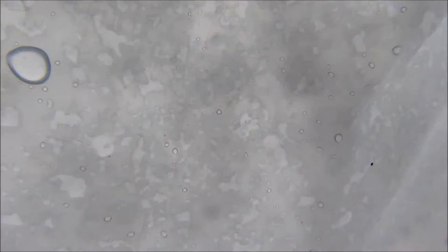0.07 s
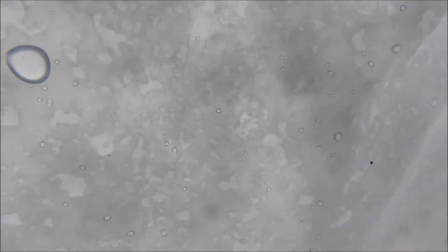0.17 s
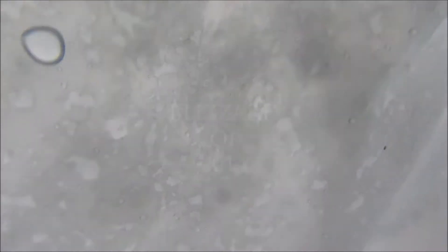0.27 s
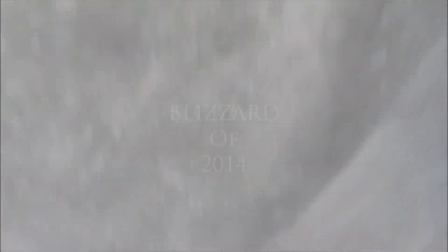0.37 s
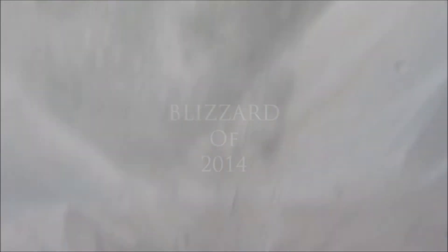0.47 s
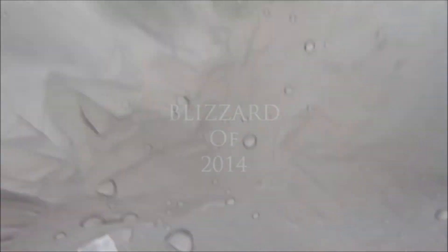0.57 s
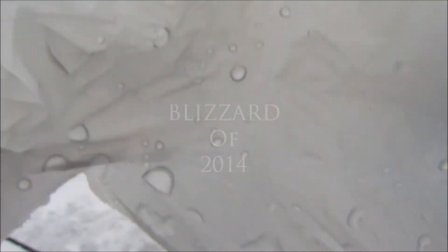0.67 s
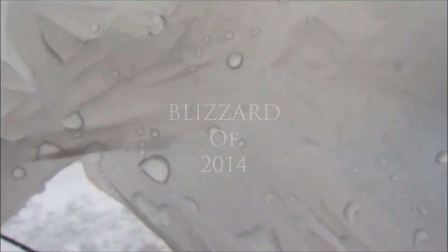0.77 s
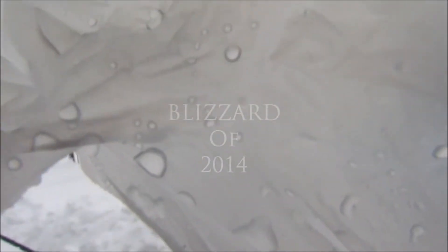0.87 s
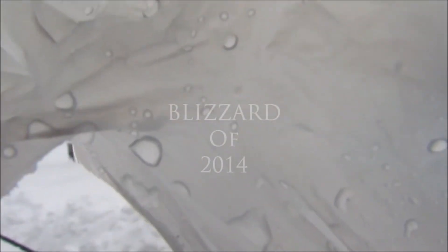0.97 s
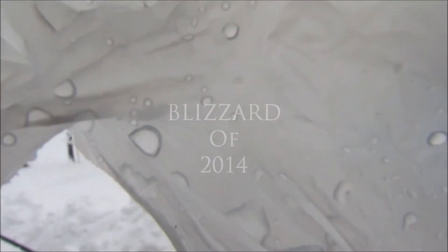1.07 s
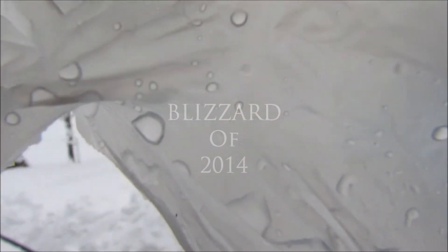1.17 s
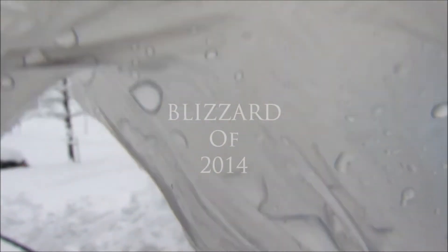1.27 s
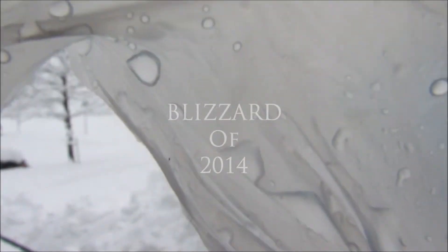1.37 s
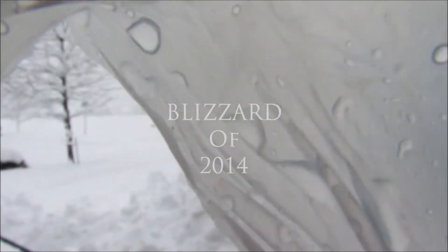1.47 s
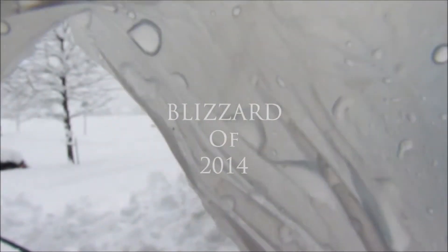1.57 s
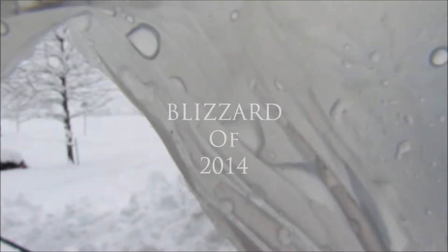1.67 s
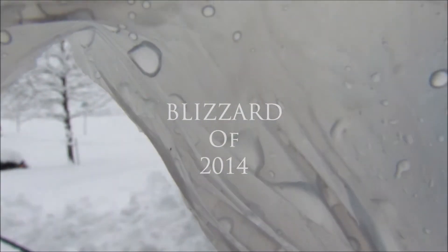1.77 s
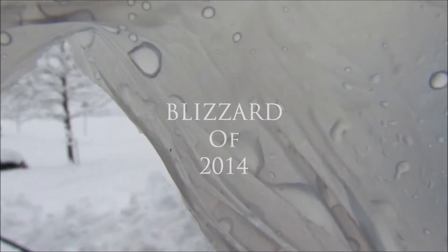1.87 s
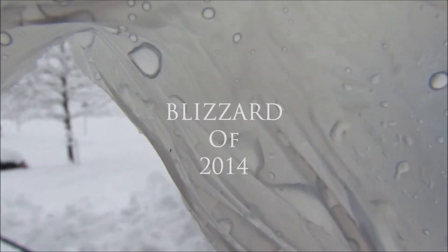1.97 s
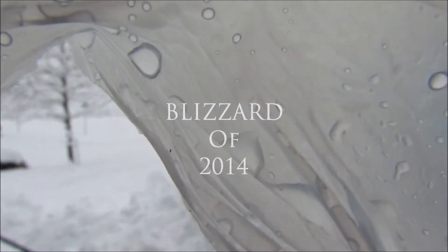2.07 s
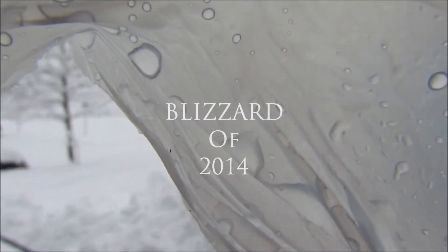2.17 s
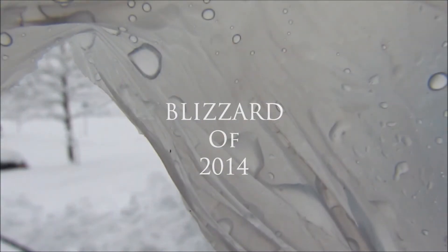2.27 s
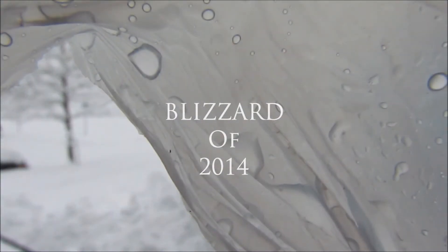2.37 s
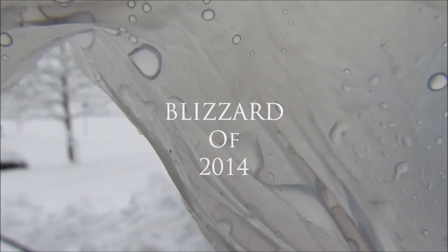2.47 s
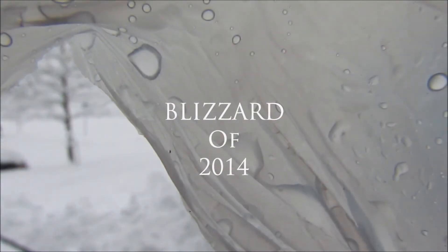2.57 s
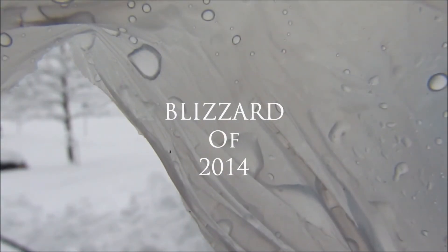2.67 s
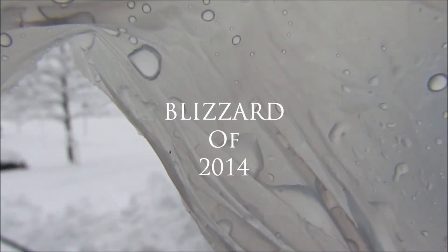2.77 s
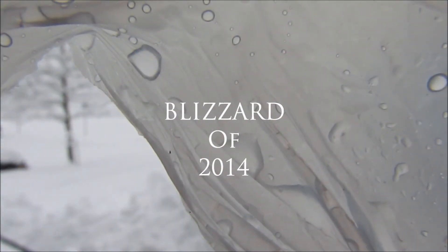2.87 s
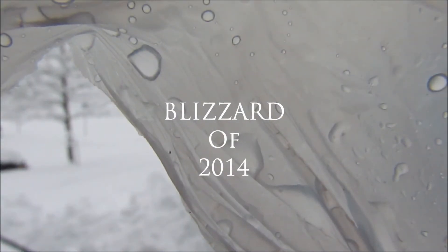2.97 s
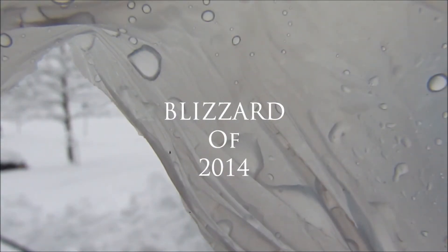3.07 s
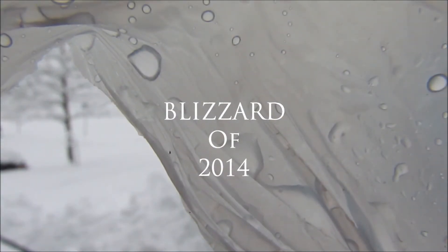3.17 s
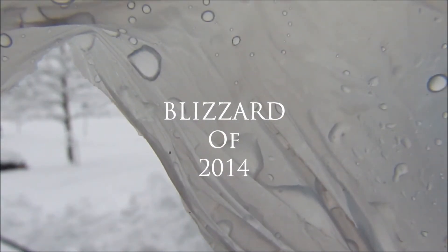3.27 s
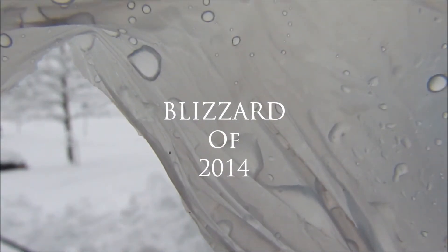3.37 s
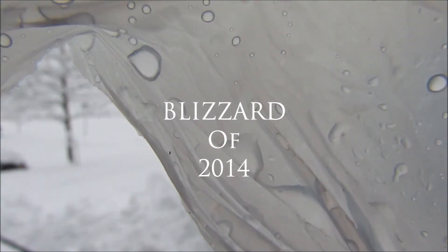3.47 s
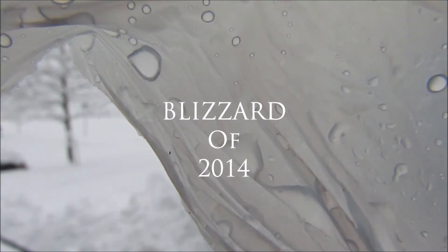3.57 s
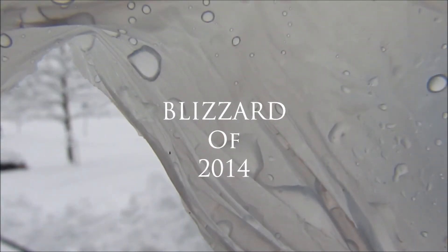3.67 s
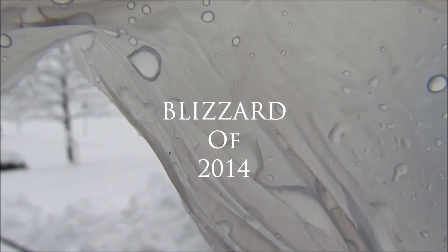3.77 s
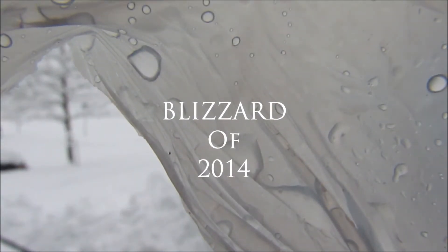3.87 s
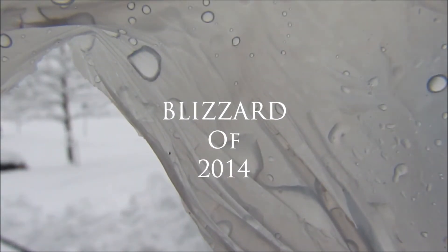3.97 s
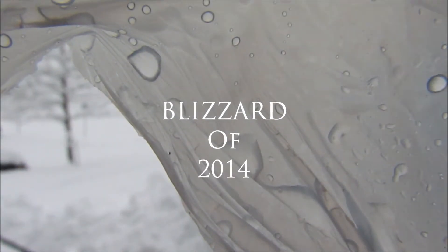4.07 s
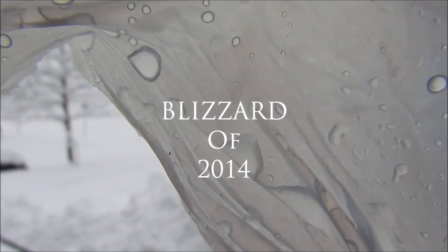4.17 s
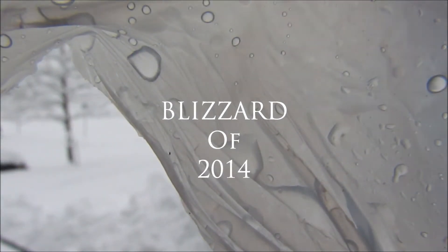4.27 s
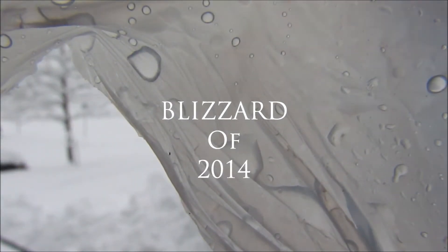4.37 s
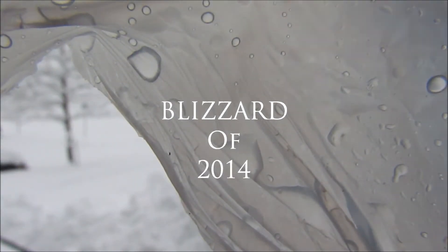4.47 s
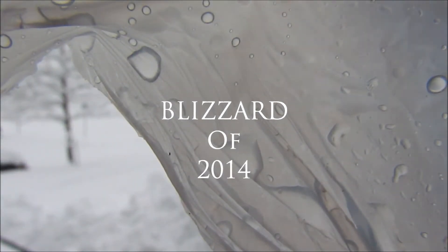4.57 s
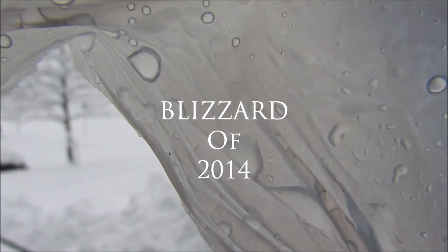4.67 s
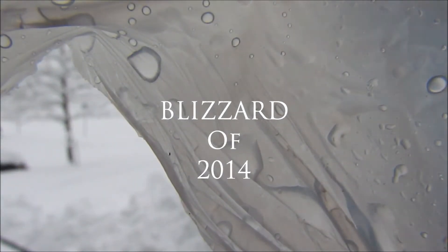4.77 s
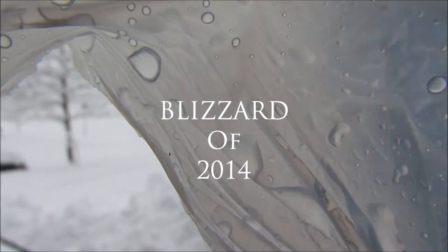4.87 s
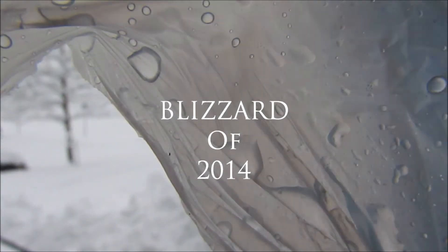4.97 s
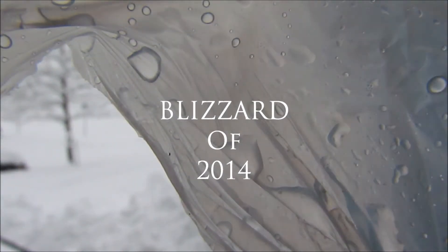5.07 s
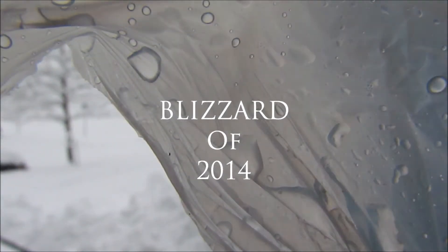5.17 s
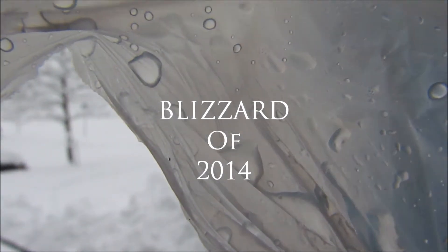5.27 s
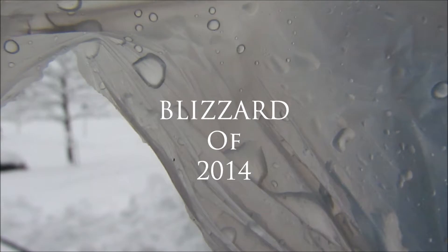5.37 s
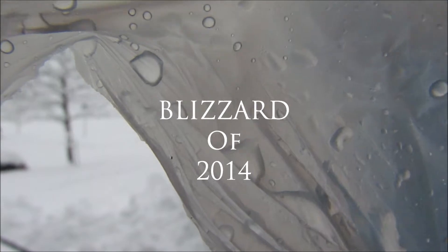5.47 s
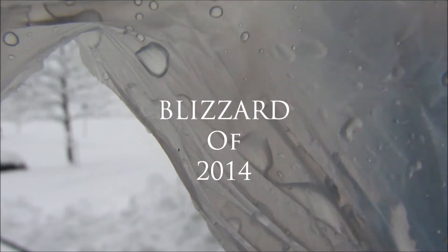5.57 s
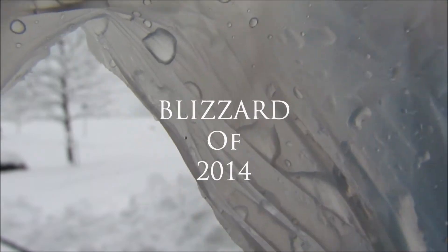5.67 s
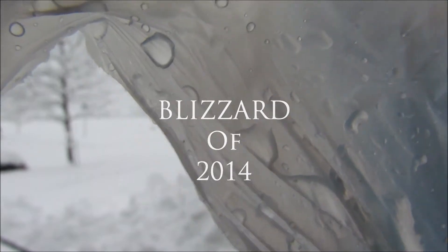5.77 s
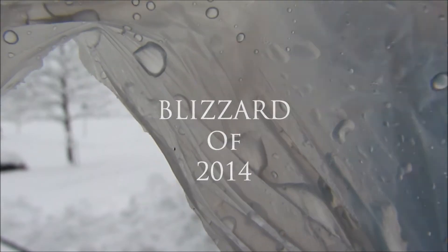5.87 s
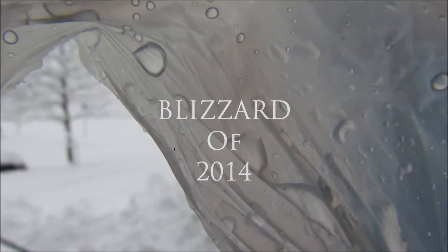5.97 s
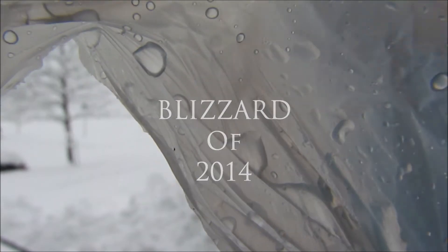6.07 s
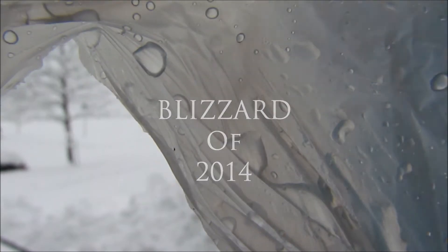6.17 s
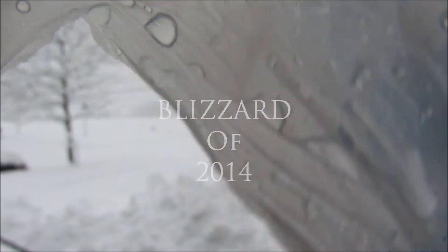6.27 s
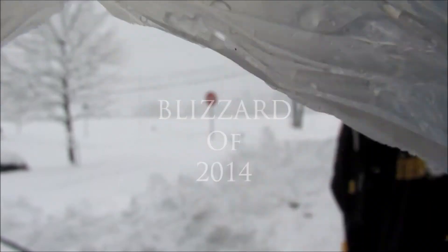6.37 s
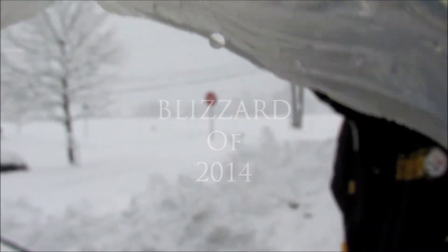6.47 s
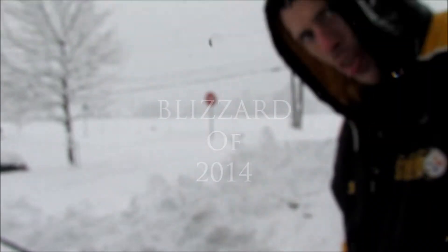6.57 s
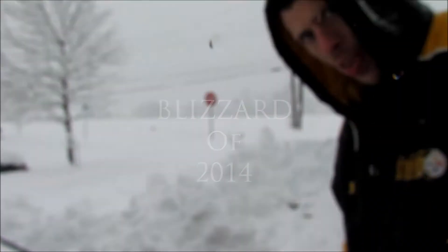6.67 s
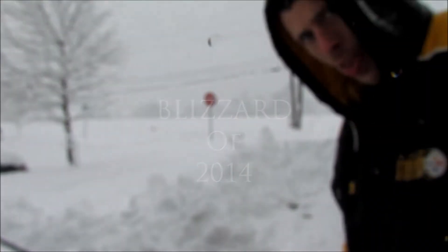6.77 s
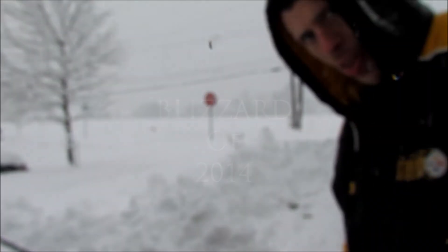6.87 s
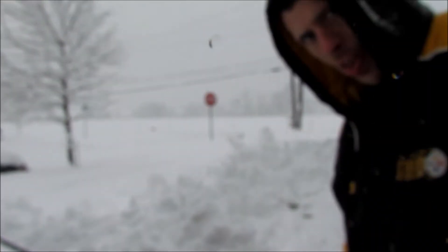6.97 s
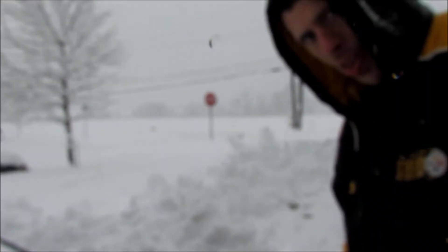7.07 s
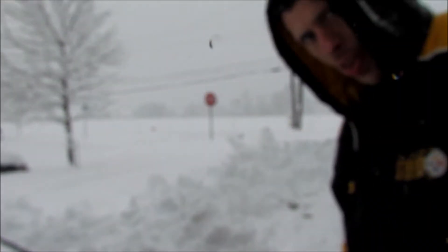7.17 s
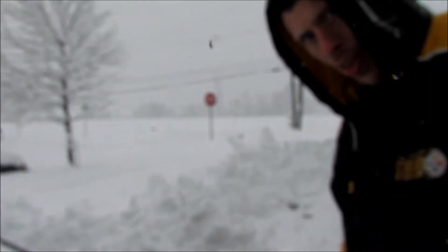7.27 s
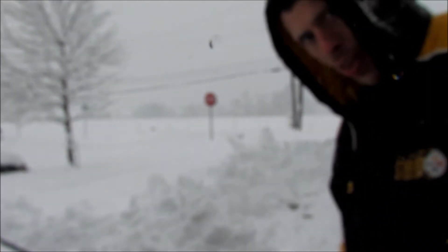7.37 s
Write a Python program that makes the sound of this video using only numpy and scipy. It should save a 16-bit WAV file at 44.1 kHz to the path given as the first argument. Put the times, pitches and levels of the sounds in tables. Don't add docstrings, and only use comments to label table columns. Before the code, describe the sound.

After a tiny silent gap, sound opens at about 0.16 s with a thin plastic sheet being pulled right across a stereo microphone outdoors. Snaps cluster at 0.2-0.4 s, then dense bright crackling and rustling swell around 0.5-0.8 s. More crisp snaps follow near 0.85-1.15 s, a hard cluster at 1.4 s, and very sharp cracks at 1.86 and 2.03 s. From 2.1 to 5.3 s the sheet is merely held: faint hiss and muffled still air, with scattered small ticks, dull hollow pops near 3.04 and 3.3 s, a snap at 3.75 s, a small flurry at 4.3-4.65 s and a pop at 5.0 s. At 5.37 s a strong crackle and thump begin the lifting; crinkling comes in uneven bursts, loud at 6.3 s, then fuller rustling from 6.45 s, with a hard snap at 7.03 s and last clicks and pops until about 7.4 s.

```python
import sys
import numpy as np
from scipy import signal
from scipy.fft import rfft, irfft, next_fast_len
from scipy.io import wavfile
from scipy.ndimage import uniform_filter1d, map_coordinates

SR = 44100
rng = np.random.default_rng(int(sys.argv[2]) if len(sys.argv) > 2 else 0)


def field_ratio(decibels):
    return 10 ** (np.asarray(decibels, dtype=float) / 20)


def file_out(sig):
    cols = np.atleast_2d(sig).T
    lim = np.clip(cols, -1, 1)
    pcm = np.round(lim * 32767).astype(np.int16)
    wavfile.write(sys.argv[1], SR, pcm)


N = 327663

# freq_hz, density_db
CREASE = [(1500, -14.5), (3000, -6.5), (4300, -7.5), (7500, -2.5), (9300, -1.5), (11600, -2), (15200, -19),
          (16000, -49), (17000, -40)]
# freq_hz, density_db
RUSTLE = [(300, -38), (800, -6.5), (1500, -2.5), (2800, -6.5), (5000, -10), (9000, -11)]
# start_s, peak_db, pitch_hz, left_minus_right_db
POPS_HELD = [(2.141, -39.5, 812, 11), (2.2125, -40.5, 820, 4), (2.3278, -36, 820, 3),
             (2.3944, -35.5, 736, 9), (2.459, -38, 1100, -8), (2.6694, -36, 1110, -10),
             (2.7293, -27.5, 430, -4), (2.857, -45, 1250, -6), (2.893, -37.5, 1660, -7),
             (3.0414, -15.5, 1010, 2.5), (3.1361, -22.5, 870, 1.5), (3.2378, -34, 865, -7),
             (3.7458, -29, 800, -4.5), (3.895, -35.5, 1400, -1), (4.101, -22, 765, 1),
             (4.19, -29.5, 770, 0), (4.4767, -23, 1580, -3), (4.5155, -42, 1700, -10),
             (4.6095, -31, 1560, 4), (4.9955, -19, 534, -3.5), (5.0199, -13, 964, 2)]
# start_s, peak_db, pitch_hz, left_minus_right_db
POPS_SLACK = [(0.4577, -20.5, 637, 15), (2.2732, -37, 730, 0), (3.2819, -17.5, 714, 1.5),
              (3.8705, -41, 370, -8), (4.0533, -32.5, 374, 1), (4.2912, -20, 460, 0),
              (4.5518, -22, 486, -.5), (4.7236, -36, 766, 3), (6.1846, -32, 686, -1),
              (6.3017, -23, 1560, 11), (7.1704, -16.5, 700, -1), (7.3252, -35.5, 760, -16)]


def crumpling():
    # freq_hz, density_db
    panel_spectrum = [(8, -60), (30, -8), (135, 0), (300, -3.5), (600, -8), (1200, -14.5), (2500, -18),
                      (7000, -46)]
    # freq_hz, gain_db
    held_spectrum = [(1500, -4.5), (4500, -2), (6300, -7), (8000, 4.5), (9800, -7.5), (12000, 4),
                     (14000, -1.5)]
    # time_s, left_minus_right_db
    hand_side = [(0.3, 2.5), (1.0, -5.5), (1.7, 0), (2.4, -1.5), (3.1, -0.6), (3.8, -1.5), (4.5, -0.2),
                 (5.2, -3.0), (5.9, -7.5), (6.6, -4), (7.3, -1.5)]
    flex_lingers = 1.344
    jerk_db = 1.25 * wobble(30) + 1.37 * wobble(75)
    held = grip()

    creases = swarm(CREASE, 700, 4.5, alike=0.05, smooth=0.3, clump_db=3.0, clump_rate=160)
    creases = patchy(creases, depth_db=3.5)
    tugged = effort(over_share=0, over_db=0, lingers=0.91) * creases
    crackle = field_ratio(2.5 + jerk_db) * (tugged + held * coloured(creases, held_spectrum))

    rubbing = np.hypot(effort(over_share=0.47, over_db=-1.5, lingers=np.sqrt(flex_lingers)), held * field_ratio(1.5))
    rubs = swarm(RUSTLE, 500, 4.0, alike=0.54, smooth=0.99, clump_db=3.4, clump_rate=90)
    rustle = rubbing * field_ratio(2.5 + 0.79 * jerk_db) * rubs

    start_s, peak_db, _, pan_db = np.concatenate([POPS_HELD, POPS_SLACK]).T
    sway = np.hypot(effort(over_share=1, over_db=0, lingers=flex_lingers), held * field_ratio(-5))
    sway = sway + settling(start_s, peak_db - 26.5, pan_db, t60=0.15)
    bends = swarm(panel_spectrum, 500, 0.88, alike=0.68, smooth=1.23, clump_db=2.16, clump_rate=40, roam_db=1.5)
    flex = sway * field_ratio(2.0 + 0.27 * jerk_db) * bends

    side_db = np.interp(np.arange(N) / SR, *np.transpose(hand_side))
    return sides(side_db) * (crackle + rustle + flex)


def effort(over_share, over_db, lingers):
    # peak_s, crackle_db, rise_s, fall_s, flex_over_crackle_db
    drawing = [(.19, -49, 0.14, .2, -11), (.264, -42, 0.14, 0.43, -1.5), (.359, -34.5, 0.054, 0.45, 4),
               (.469, -28.5, 0.27, 0.11, -10), (.564, -27.5, 0.22, 0.075, -8.5),
               (.663, -32, .4, 0.045, -24), (.748, -31.5, 0.11, 0.37, -13.5),
               (.853, -34, 0.25, 0.025, -0.5), (.933, -37, 0.099, 0.018, -5.5),
               (1.003, -39, 0.024, 0.22, -7.5), (1.098, -39.5, 0.046, .3, -9), (1.207, -30, 0.13, .13, -9),
               (1.307, -42.5, 0.16, 0.059, -4.5), (1.392, -32.5, 0.066, 0.44, -10),
               (1.556, -34.5, 0.13, 0.31, -3), (1.846, -47, 1, 0.075, 2.5), (4.09, -62.5, 0.094, 0.11, 15),
               (5.3, -56.5, 0.081, .1, 5.5)]
    # peak_s, crackle_db, rise_s, fall_s, flex_over_crackle_db
    lifting = [(5.373, -23.5, 0.01, 0.084, -4), (5.522, -42.5, .15, 0.043, -2.5),
               (5.592, -47.5, 0.011, 0.033, 8), (5.659, -33.5, 0.046, 0.52, -14),
               (5.772, -32, 0.24, 0.2, -1), (5.917, -27, 0.067, 0.024, -8), (5.975, -57, 0.023, 0.074, 5),
               (6.021, -52.5, 0.037, 0.11, 6.5), (6.189, -42, 0.015, 0.12, -21.5),
               (6.32, -19.5, 0.04, 0.059, -15), (6.45, -27.5, 0.15, 0.071, -6.5),
               (6.645, -31.5, 0.35, 0.3, -4.5), (6.764, -30, 0.19, 0.25, -10),
               (6.92, -25.5, 0.14, 0.044, -13), (7.039, -32.5, 0.027, 0.053, 0.5),
               (7.087, -27, 0.083, .065, -11.5), (7.189, -28.5, 0.11, 0.081, -4.5),
               (7.423, -40, 0.22, 0.26, -5)]
    swell_db = 28
    rounded = 1.118
    t = np.arange(0, N / SR + .01, .001)
    peak_s, crackle_db, rise_s, fall_s, flex_db = np.concatenate([drawing, lifting]).T[..., None]
    before = (peak_s - t) / np.maximum(rise_s, .003)
    after = (t - peak_s) / np.maximum(fall_s, .003)
    away = np.maximum(before, after) / lingers
    tug_db = crackle_db + over_share * flex_db + over_db - swell_db * away ** rounded
    power = (field_ratio(tug_db) ** 2).sum(axis=0)
    return np.interp(np.arange(N) / SR, t, np.sqrt(power))


def grip():
    # time_s, crackle_db
    restless = [(0, -69), (1.93, -63), (2.74, -64), (2.84, -64), (3.19, -57), (3.43, -63), (3.96, -61),
                (4.11, -54), (4.25, -58.5), (4.67, -61), (4.92, -52.5), (5.08, -55.5), (5.22, -56),
                (5.35, -49), (5.6, -55), (6.15, -90), (7.43, -48)]
    return field_ratio(np.interp(np.arange(N) / SR, *np.transpose(restless)))


def swarm(spectrum, per_s, size_db, alike, smooth, clump_db, clump_rate, roam_db=4.5):
    fires = rng.random(N) < per_s / SR
    sizes = fires * field_ratio(size_db * np.minimum(rng.exponential(size=N), 3.0))
    life = np.exp(-np.arange(80) / 14.9)
    gate = unit(signal.fftconvolve(sizes, life)[:N]) + smooth
    turn = np.arccos(np.clip(alike, 0, 1)) / 2
    mid, side = rng.standard_normal((2, N)) * [[np.cos(turn)], [np.sin(turn)]]
    noise = np.array([mid + side, mid - side])
    clumps = field_ratio(clump_db * wobble(clump_rate))
    nearer = sides(roam_db * wobble(90))
    return coloured(gate * clumps * nearer * noise, spectrum)


def patchy(x, depth_db):
    z = signal.stft(x, nperseg=128)[2]
    field = uniform_filter1d(rng.standard_normal(z.shape[1:]), size=9, axis=0)
    field = uniform_filter1d(field, size=2, axis=1)
    return unit(signal.istft(z * field_ratio(depth_db * unit(field)), nperseg=128)[1][:, :N])


def snaps():
    # start_s, peak_db, left_minus_right_db
    drawn_snaps = [(.1608, -37, 11), (.1698, -18, -1), (.1823, -31, -10), (.2183, -19, -13.5),
                   (.257, -9, 0), (.3012, -16, -1), (.3515, -21, -11), (.3565, -12.5, 6), (.8444, -11, -1),
                   (.9003, -17, -1), (.9322, -13.5, -9), (1.0042, -28, -3), (1.0534, -22, -4),
                   (1.137, -14.5, -18), (1.3466, -20, -2), (1.3882, -10.5, -2), (1.4089, -2.5, 4),
                   (1.4406, -8, -10.5), (1.8558, -4, -3), (1.8897, -16.5, -4), (1.962, -24, 2),
                   (1.972, -17, 5), (1.989, -29, 11), (2.026, 1.5, -1)]
    # start_s, peak_db, left_minus_right_db
    settling_snaps = [(2.0607, -36, -9), (2.138, -23, 1.5), (2.2163, -28, -8), (2.2593, -33.5, -12),
                      (2.328, -28.5, 5), (2.3968, -22.5, 2), (2.461, -26.5, -6), (2.5489, -37, -10),
                      (2.6704, -21.5, -10.5), (2.7328, -14, -8.5), (2.753, -23.5, -3), (2.858, -25, 0),
                      (2.895, -31.5, -18.5), (3.0277, -26, -10), (3.0508, -31, 0), (3.125, -36.5, 16),
                      (3.174, -22.5, -12), (3.239, -20.5, -3), (3.394, -29, -6), (3.519, -28, -8),
                      (3.6061, -33, -7), (3.6633, -34, -1), (3.7479, -9.5, -4.5)]
    # start_s, peak_db, left_minus_right_db
    shifting_snaps = [(3.922, -22, 2), (3.9407, -23.5, -11), (4.193, -32, 8), (4.2448, -38, -3),
                      (4.3031, -31.5, -6), (4.3169, -18.5, 1), (4.35, -27, -4), (4.3596, -18.5, 0),
                      (4.4145, -8.5, -2), (4.4262, -23.5, 7), (4.477, -14, -2), (4.4987, -27.5, -11),
                      (4.517, -21.5, -11), (4.566, -24, -4), (4.574, -31, 0), (4.6133, -17, -4),
                      (4.643, -15.5, 4), (4.7377, -31.5, -5), (4.922, -20, 4), (4.9978, -15, -12),
                      (5.1613, -35, 10), (5.2317, -31, -8), (5.2884, -26, 2), (5.335, -19.5, 10)]
    # start_s, peak_db, left_minus_right_db
    lifting_snaps = [(5.3682, -4.5, -13), (5.438, -17.5, -9), (5.471, -14.5, -8), (5.4942, -24, -7),
                     (5.52, -15, -3), (5.592, -13, 1), (5.6344, -16, -8), (5.6479, -10.5, -7),
                     (5.8642, -8.5, -7), (5.9673, -24, -1), (6.2964, -14, 0), (6.3112, -6, 19),
                     (6.8312, -17, 4), (6.918, -15, -1.5), (6.9707, -35, -2), (7.0283, -3.5, 5),
                     (7.0423, -11, 11), (7.095, -15, 9), (7.1232, -16, 0), (7.2983, -13, -15),
                     (7.3265, -20, -11), (7.341, -18, -15), (7.3632, -23.5, -17)]
    # start_s, peak_db, left_minus_right_db
    thick_snaps = [
        (2.131, -17.5, 4.5),
        (2.143, -22, 8.5),
        (2.9462, -25, -9),
        (2.974, -25.5, -10),
        (3.2168, -14, -10),
        (4.1056, -30, -11),
        (5.02, -26, 3),
    ]
    groups = [drawn_snaps, settling_snaps, shifting_snaps, lifting_snaps, thick_snaps]
    start_s, peak_db, pan_db = np.concatenate(groups).T
    count = len(start_s)
    thick = np.arange(count) >= count - len(thick_snaps)

    pitch_hz = 8620 * np.exp(0.14 * rng.standard_normal(count))
    pitch_hz = pitch_hz * 0.64 ** thick * field_ratio(-0.0441 * (peak_db + 16.5))
    length_s = 0.000826 * field_ratio(-.25 * (peak_db + 21))
    events = np.transpose([start_s, peak_db, pitch_hz, pan_db])
    cracks = buckles(events, length_s, cycles=0.5, spread=0.29, fall=0.12, alike=0.65, gain_db=-4.5, count=5)

    tear_db = -33 + 0.68 * (peak_db + 20.5)
    tearing = swarm(CREASE, 3000, 3.8, alike=0.18, smooth=0.46, clump_db=1.0, clump_rate=300)
    return settling(start_s, tear_db, pan_db, t60=0.012) * tearing + cracks


def pops():
    # start_s, peak_db, pitch_hz, left_minus_right_db
    tugged_pops = [(.181, -32.5, 528, -10), (.264, -24, 428, -10), (.4062, -18, 428, 15),
                   (1.0883, -23.5, 295, -3), (1.1361, -25, 950, -13), (1.21, -21.5, 574, -3),
                   (1.4393, -21.5, 1250, -9), (1.9881, -36, 465, -3), (2.0238, -36, 1530, 7),
                   (2.062, -43, 290, -12), (5.2295, -38, 1080, -13), (5.3785, -12, 454, -3),
                   (5.4673, -20, 1310, -5), (5.916, -19, 630, -7), (6.3303, -17, 670, -2),
                   (6.893, -16, 556, -2), (7.0861, -17.5, 472, 4)]
    events = np.concatenate([tugged_pops, POPS_HELD, POPS_SLACK])
    start_s, peak_db, pitch_hz, pan_db = events.T
    shuffling = swarm(RUSTLE, 1500, 6.0, alike=0.63, smooth=0.69, clump_db=6.6, clump_rate=200)
    shuffle = settling(start_s, peak_db - 8.5, pan_db, t60=0.036) * shuffling

    slack = np.arange(len(events)) >= len(events) - len(POPS_SLACK)
    length_s = 0.00286 + 4.07 / pitch_hz + 0.0108 * slack
    flips = buckles(events, length_s, cycles=0.55, spread=0.532, fall=0.34, alike=0.947, gain_db=-4.0, count=12)
    panel_band = signal.butter(3, [130, 2800], "band", fs=SR, output="sos")
    return signal.sosfilt(panel_band, shuffle + flips)


def buckles(events, lengths_s, cycles, spread, fall, alike, gain_db, count):
    out = np.zeros((2, N + SR))
    lucks = rng.standard_normal((len(events), 4, count))
    for (start_s, peak_db, pitch_hz, pan_db, *_), length, luck in zip(events, lengths_s, lucks):
        t = np.arange(int((4 * length + 40 / pitch_hz) * SR)) / SR
        late = np.abs(luck[0]) * (np.arange(count) > 0)
        apart = np.linspace(-1.5, 1.5, count)[np.argsort(luck[1])]
        slip_hz = np.clip(pitch_hz * np.exp(spread * apart - fall * (late - .6)), 170, 12500)
        size = field_ratio(2.0 * luck[2] - 13.2 * late - 2.5 * apart ** 2)
        turns = np.clip(t - 0.5416 * length * late[:, None], 0, None) * slip_hz[:, None]
        shape = size[:, None] * turns * np.exp(-turns / cycles)
        skew = (1 - np.clip(alike, 0, 1)) * luck[3]
        ports = [shape * np.sin(2 * np.pi * (turns + side * skew[:, None])) for side in (.5, -.5)]
        pair = np.array(ports).sum(axis=1)
        peak = np.sqrt(np.mean(pair ** 2, axis=0).max())
        out[:, round(start_s * SR):][:, :len(t)] += field_ratio(peak_db + gain_db) * sides(pan_db)[:, None] * pair / peak
    return out[:, :N]


def settling(times, levels_db, pans_db, t60):
    kicks = np.zeros((2, N + SR))
    kicks[:, np.round(times * SR).astype(int)] = field_ratio(levels_db) * sides(pans_db)
    return signal.lfilter([1], [1, -field_ratio(-60 / (t60 * SR))], kicks)[:, :N]


def air():
    # freq_hz, density_db
    air_spectrum = [(15, -30), (28, 31), (190, -5), (600, -11), (1500, 4.5), (3500, -15), (6400, -36),
                    (7900, -22), (9600, -52), (11700, -6), (15200, -14), (16500, -32)]
    a, b = rng.standard_normal((2, N))
    ports = np.array([a + 0.33 * b, a - 0.35 * b])
    return field_ratio(-72.5 + 1.2 * wobble(58)) * coloured(ports, air_spectrum)


def unit(x):
    return x / np.sqrt(np.mean(x ** 2) + 1e-20)


def wobble(rate):
    knots = rng.standard_normal(int(N * rate / SR) + 4)
    return map_coordinates(knots, [np.arange(N) * rate / SR])


def coloured(x, points):
    m = next_fast_len(N + 8192)
    hz, db = np.transpose(points)
    bins = np.log(np.fft.rfftfreq(m, 1 / SR) + 1)
    gain = field_ratio(np.interp(bins, np.log(hz), db))
    return unit(irfft(rfft(x, m) * gain, m)[..., :N])


def sides(pan_db):
    return field_ratio(np.array([pan_db, -pan_db]) / 2)


def scene():
    return crumpling() + snaps() + pops() + air()


def starved(x, deep_db, faint_db, sudden_db, quiet_db):
    treble_hz, top_hz = 3600, 15650
    hz, _, z = signal.stft(x, SR, nperseg=256)
    frames = z.shape[2] // 8 * 8
    power = np.abs(z[0, :, :frames]) ** 2 + np.abs(z[1, :, :frames]) ** 2
    bands = np.repeat(power[:126].reshape(21, 6, -1).mean(axis=1), 6, axis=0)
    cells = np.pad(bands, ((0, 3), (0, 0))).reshape(len(hz), -1, 8)
    high = cells[(hz > treble_hz) & (hz < top_hz)]
    treble = high.sum(axis=0)
    usual = np.median(treble, axis=1)
    sudden = treble.max(axis=1) > usual * field_ratio(2 * sudden_db)
    startled = (sudden | np.roll(sudden, -1)) & (usual < field_ratio(2 * quiet_db))
    faint = startled[:, None] & (cells < np.median(high, axis=(0, 2))[:, None] * field_ratio(-2 * faint_db))
    buried = cells < cells.max(axis=2, keepdims=True) * field_ratio(-2 * deep_db)
    click = sudden[:, None] & (treble > treble.max(axis=1, keepdims=True) / 10)
    bin_hz = hz[:, None, None]
    top = (bin_hz > top_hz) & ~click | (bin_hz > 16800)
    lost = ((faint | buried) & (bin_hz > treble_hz) | top).reshape(len(hz), -1)
    kept = ~np.pad(lost, ((0, 0), (0, z.shape[2] - frames)))
    return signal.istft(z * kept, SR, nperseg=256)[1][:, :N]


def band_limit(x):
    return signal.sosfilt(signal.butter(12, 16840, fs=SR, output="sos"), x)


def record(dry):
    opened = dry * (np.arange(N) > 0.157 * SR)
    steady = signal.sosfilt(signal.butter(2, 22, "high", fs=SR, output="sos"), opened)
    rounded = steady / (1 + np.abs(steady / .7) ** 4) ** (1 / 4)
    mix = starved(rounded, deep_db=29.5, faint_db=2.0, sudden_db=11.0, quiet_db=-41)
    return band_limit(mix)


dry = scene()
out = record(dry)
file_out(out)
```